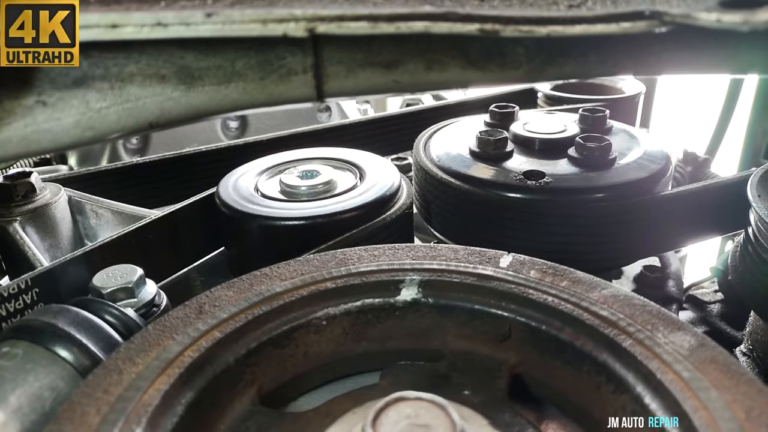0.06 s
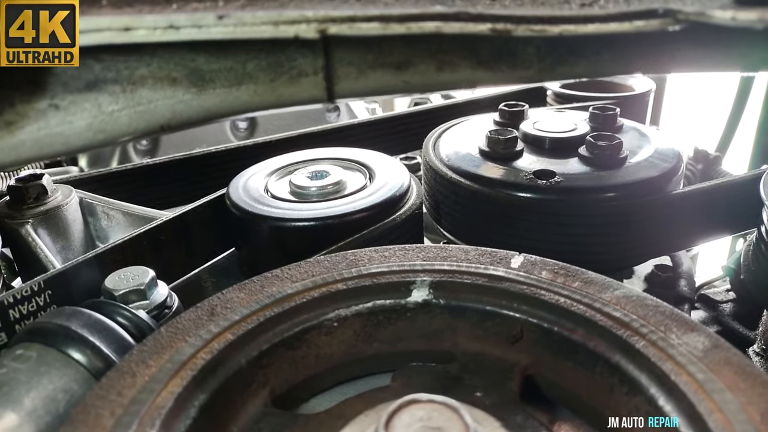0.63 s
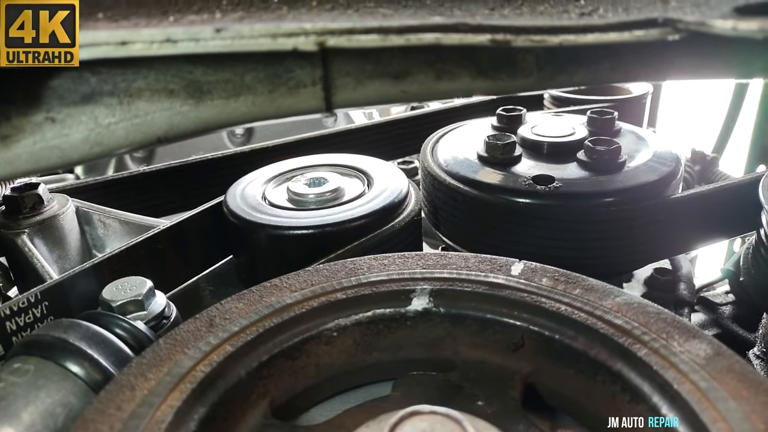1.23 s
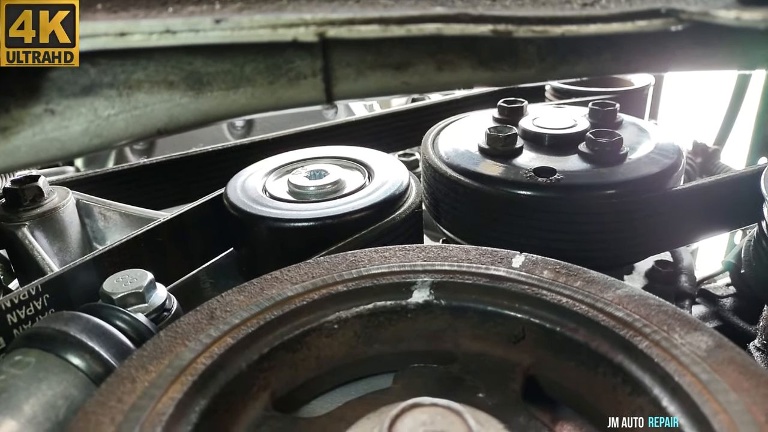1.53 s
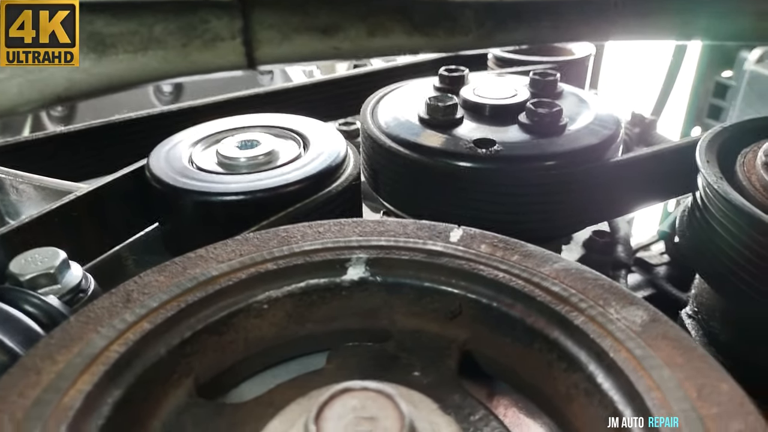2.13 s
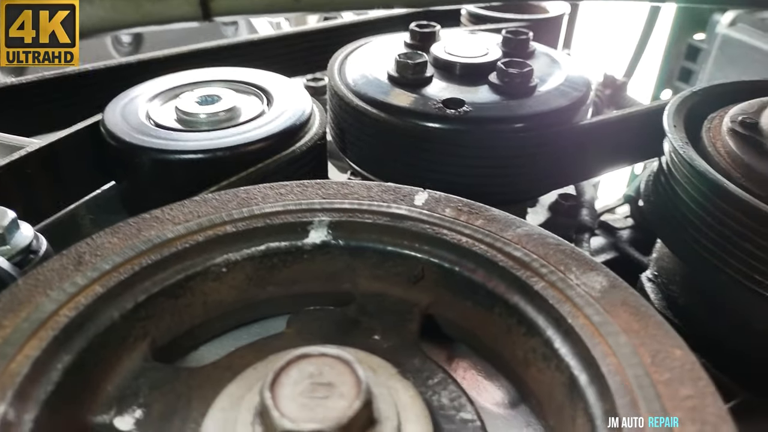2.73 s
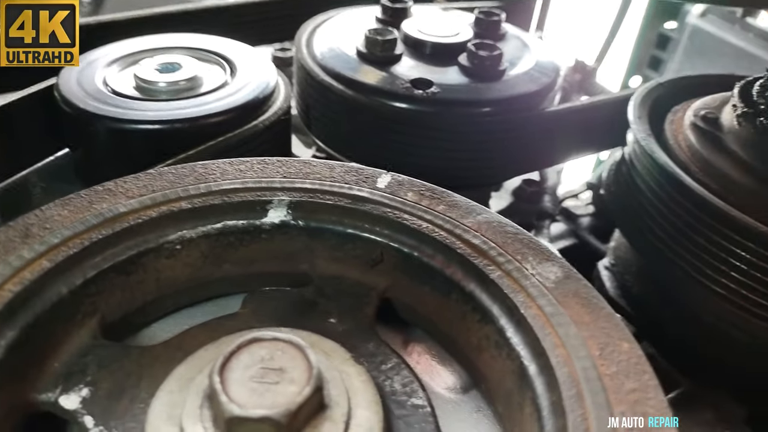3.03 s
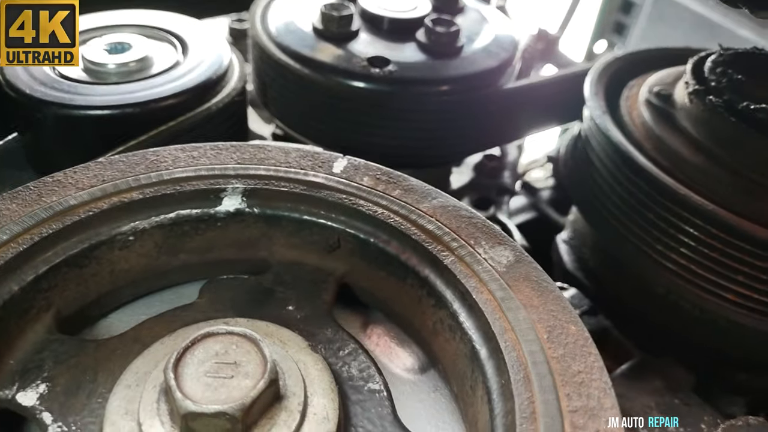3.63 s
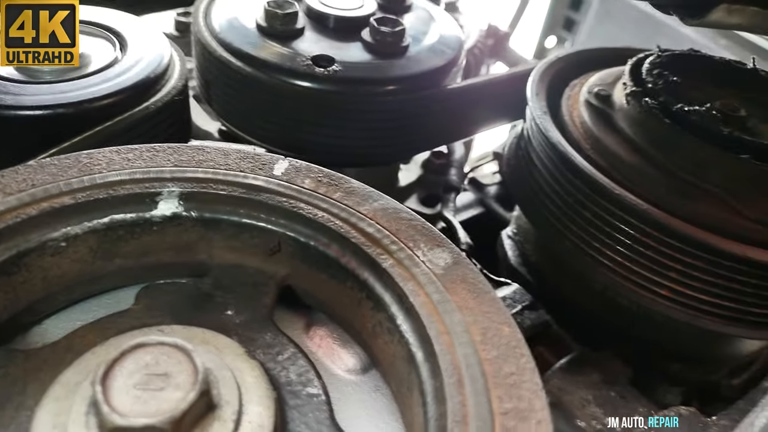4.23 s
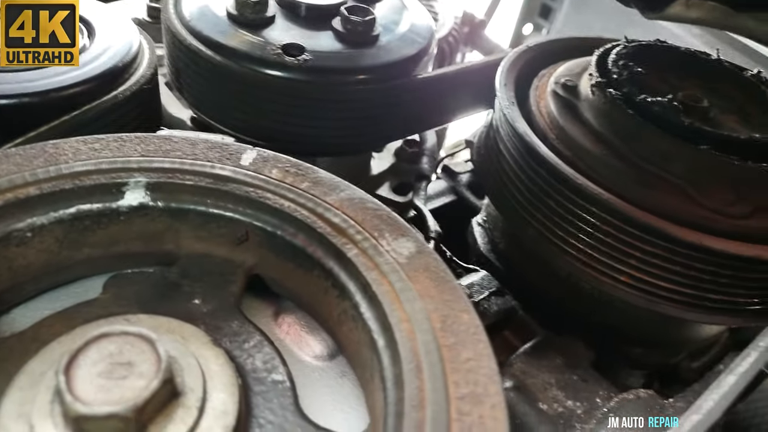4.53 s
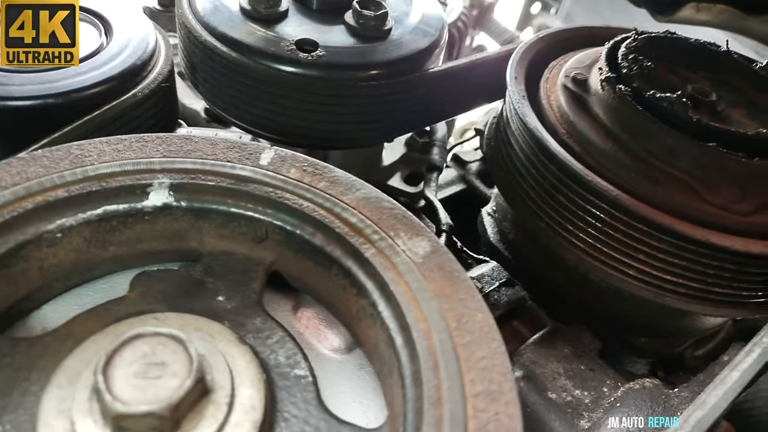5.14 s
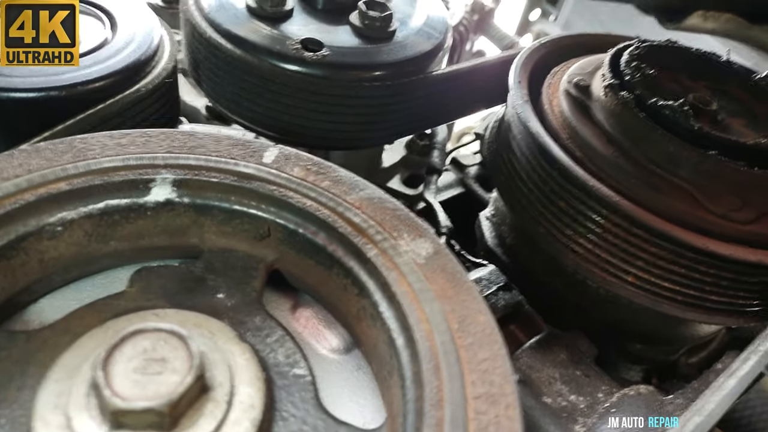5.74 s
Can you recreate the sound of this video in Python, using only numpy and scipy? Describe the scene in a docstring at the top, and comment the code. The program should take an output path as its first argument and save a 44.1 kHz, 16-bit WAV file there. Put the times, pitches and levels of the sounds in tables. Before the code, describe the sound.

Sparrows chirp outdoors over a soft low rumble, with a rooster crowing faintly far away. About two seconds in, a fingertip drags off the right side of the microphone with a loud shuddering thump, followed by several brushing strokes that fade. Small creaks and ticks from the grip come near the end as a distant rooster crows again. The phone is held under a car's stopped engine.

```python
"""A shuddering thump and several brushing strokes sound on the right, followed by small creaks and ticks,
while sparrows chirp and far roosters crow over a low rumble. A phone is held outdoors under a car's
stopped engine. A fingertip seals its right microphone, drags off it by stick-slip friction and brushes
past; the ticks come from the grip on the shell. The birds' voices scatter in the engine bay and yard."""
import sys
import numpy as np
from scipy import signal
from scipy.fft import rfft, irfft, next_fast_len
from scipy.io import wavfile
from scipy.ndimage import uniform_filter1d

SR = 44100
rng = np.random.default_rng(int(sys.argv[2]) if len(sys.argv) > 2 else 0)


def log_audio(samples):
    """Write samples as a 16-bit WAV file to the path given in sys.argv[1]."""
    # one column per channel
    frames = np.atleast_2d(samples).T
    # limit to full scale, then quantise
    limited = np.clip(frames, -1, 1)
    pcm = np.round(limited * 32767).astype(np.int16)
    wavfile.write(sys.argv[1], SR, pcm)


N = 263277
TIME = np.arange(N) / SR


def undb(db):
    """Decibels to amplitude ratio."""
    return 10 ** (np.asarray(db) / 20)


def unit(x):
    """Normalisation to an rms of 1."""
    return x / np.sqrt(np.mean(x ** 2) + 1e-20)


def curve(rows):
    """Linear interpolation of (time_s, value) rows at every sample."""
    return np.interp(TIME, *np.transpose(rows))


def colour(x, spectrum):
    """Zero-phase filtering by (frequency_hz, gain_db) rows, interpolated in log frequency."""
    size = next_fast_len(x.shape[-1])
    hz, db = np.transpose(spectrum)
    gain = undb(np.interp(np.log(np.fft.rfftfreq(size, 1 / SR) + 1e-9), np.log(hz), db))
    return irfft(rfft(x, size) * gain, size)[..., :x.shape[-1]]


def lowpass(x, hz):
    """Two-pole Butterworth low-pass."""
    return signal.sosfilt(signal.butter(2, min(hz, SR / 2 - 1), fs=SR, output="sos"), x)


def moving_lowpass(x, hz):
    """Time-varying low-pass: a crossfade between filters half an octave apart."""
    step = 2 * np.log2(np.clip(hz, 20, SR / 2))
    nearby = range(int(step.min()), int(step.max()) + 2)
    return sum(np.maximum(1 - np.abs(step - k), 0) * lowpass(x, 2 ** (k / 2)) for k in nearby)


def wander(rate_hz):
    """Smooth random modulation with an rms of 1."""
    hop = max(int(SR / rate_hz), 1)
    knots = rng.standard_normal(N // hop + 2)
    return unit(uniform_filter1d(np.interp(np.arange(N) / hop, np.arange(len(knots)), knots), hop))


def bell(peak_s, rise_s, fall_s, squareness=1.11):
    """Asymmetric bell-shaped envelope."""
    late_s = TIME - peak_s
    return np.exp(-np.abs(late_s / np.where(late_s < 0, rise_s, fall_s)) ** squareness / 2)


def add(out, start_s, x):
    """Superposition of x on out from start_s."""
    i = int(np.clip(start_s * SR, 0, N - 1))
    out[..., i:i + x.shape[-1]] += x[..., :N - i]


def yard(x, t60_s, tail_db, scatter_s, scatter_db):
    """Reverberation: each microphone gets the direct path, engine-bay scatter and an outdoor tail."""
    t = np.arange(SR // 2) / SR
    channels = []
    for lag_samples in (9, 0):
        scatter = rng.standard_normal(len(t)) * np.exp(-t / scatter_s)
        tail = rng.standard_normal(len(t)) * (1 - np.exp(-t / .011)) * undb(-60 * t / t60_s)
        response = undb(scatter_db) * scatter / np.linalg.norm(scatter)
        response += undb(tail_db) * tail / np.linalg.norm(tail)
        response[lag_samples] += 1
        channels.append(signal.fftconvolve(x, response / np.linalg.norm(response))[:N])
    return np.array(channels)


def air(level_db=-65.5):
    """Ambient noise: distant rumble, far birds and thin hiss merge into one steady spectrum."""
    # outdoor noise spectrum: frequency_hz, relative_db
    spectrum = [(25, -18), (58, 4.5), (82, 7), (188, -14), (260, -20), (630, -21), (1000, -25),
                (2000, -25.5), (3000, -25), (4100, -21), (5500, -32), (9000, -42), (15500, -47)]
    return unit(colour(rng.standard_normal((2, N)), spectrum)) * undb(level_db)


def hand():
    """Structure-borne noise: the hand shifting on the phone makes a soft rumble."""
    # envelope of the rumble: time_s, level_db
    levels = [(0, -65), (.5, -71.5), (1.6, -74.5), (2.2, -56), (3.5, -59), (4.3, -60.5), (5.5, -63),
              (5.97, -62)]
    # its spectrum: frequency_hz, relative_db
    spectrum = [(25, -40.5), (60, -2), (100, 4), (160, 1), (240, -11), (380, -11.5), (650, -24),
                (1300, -28), (2500, -42), (6000, -42.5), (15000, -50.5)]
    return unit(colour(rng.standard_normal((2, N)), spectrum)) * undb(curve(levels))


def roosters(sag=.04, flutter_db=3):
    """Harmonic voicing: each far note swells, fades and sags, and pitch jitter makes it hoarse."""
    # drawn-out notes: start_s, length_s, pitch_hz, level_db, jitter_share
    crows = [(.06, 1.44, 850, -75, .011), (1.4, .8, 788, -81.5, .016), (4.18, .44, 615.4, -80, .088),
             (5.4, .29, 634.4, -65.5, 0.039), (5.72, .31, 667, -68, 0.05)]
    # the throat favours the second partial: harmonic_number, gain_db
    throat = [(1, -12.5), (2, -4.5), (3, -21.5)]
    out = np.zeros(N)
    for start_s, length_s, pitch_hz, level_db, jitter in crows:
        progress = np.clip((TIME - start_s) / length_s, 0, 1)
        hz = pitch_hz * (1 - sag * progress) * (1 + jitter * wander(170))
        phase = 2 * np.pi * np.cumsum(hz) / SR
        voice = sum(undb(db) * np.sin(round(k) * phase) for k, db in throat)
        swell = np.abs(np.sin(np.pi * progress)) ** 1.5
        out += unit(voice) * undb(level_db + flutter_db * wander(45)) * swell
    return yard(out, t60_s=.55, tail_db=0, scatter_s=.006, scatter_db=3.5)


def flock(count=14, length_s=.09, centre_hz=3790, spread_octaves=.7, level_db=-79.5):
    """Spreading loss leaves the farther sparrows faint: chirp rows at random times and pitches."""
    return [((k + when) / count * N / SR, length_s, centre_hz * 2 ** (spread_octaves * (pitch - .5)),
             level_db, rasp) for k, (when, pitch, rasp) in enumerate(rng.random((count, 3)))]


def chatter(start_s=5.013, period_s=.085, length_s=.056, top_hz=4700, first_db=-70.5, fade_db=1.8):
    """Periodic repetition: chirp rows for one bird's run of raspy, ever fainter notes."""
    return [(start_s + k * period_s, length_s, top_hz, first_db - k * fade_db, 1) for k in range(4)]


def sparrows(warble=.018, flutter_db=3.5, buzz_ratio=.9, buzz_jitter=.1, buzz_db=1.5):
    """Two-voice syrinx: one half whistles a pitch glide; in raspy chirps the other buzzes lower."""
    # chirps that rise and fall: start_s, length_s, top_hz, level_db, rasp_share
    arches = [(.044, 0.062, 4300, -67, .9), (0.104, .11, 4002, -60.5, 0.9), (0.405, .11, 3937, -64, 1),
              (0.514, 0.072, 3950, -62, 0.9), (0.621, 0.048, 3830, -62, 0.7), (.765, 0.055, 5370, -77, 0.1),
              (0.894, .135, 4230, -61.5, 0), (1.505, 0.12, 4246, -63, 1), (2.849, .115, 4204, -61.5, 1),
              (3.0, 0.097, 4560, -72.5, 0.8), (3.234, 0.06, 4646, -66.5, 0.8), (3.545, .17, 4400, -64, .9),
              (4.205, 0.061, 4014, -66, 0.14), (4.64, 0.055, 4400, -68, 1), (4.853, 0.077, 3950, -68, 1),
              (5.388, 0.044, 4280, -62, 0.4), (5.469, 0.052, 3826, -64, 0.5)]
    # chirps that only fall: start_s, top_hz, level_db
    slurs = [(.828, 3410, -71.5), (1.278, 3200, -76.5), (1.64, 3910, -68), (1.808, 3255, -70),
             (1.89, 4150, -65.5), (1.995, 3660, -66), (2.635, 3660, -68), (3.32, 3950, -70.5),
             (3.635, 3900, -64.5), (4.29, 3640, -72.5), (4.688, 3770, -65.5), (5.788, 4024, -61)]
    falling = [(start_s, .074, top_hz, level_db, .48) for start_s, top_hz, level_db in slurs]
    thin_whistle = (3.5, .05, 3250.5, -78, 0)
    out = np.zeros(N)
    wobble, flutter, roughness = wander(260), wander(110), wander(620)
    # a glide starts at the foot (-1) or top (0) of its arch; drop is the share of pitch lost in a .1 s chirp
    kinds = [(-1, .32, arches + chatter() + flock()), (0, .28, falling), (-1, .0203, [thin_whistle])]
    for arch_from, drop, chirps in kinds:
        for start_s, length_s, top_hz, level_db, rasp in chirps:
            n = int(length_s * SR)
            progress = np.linspace(0, 1, n)
            span = rng.integers(N // 2) + np.arange(n)
            sweep = drop * (length_s / .1) ** .35  # longer chirps sweep farther
            glide = 1 - sweep * np.abs(np.linspace(arch_from, 1, n)) ** 1.8
            whistle_hz = top_hz * glide * (1 + warble * wobble[span])
            buzz_hz = buzz_ratio * whistle_hz * (1 + buzz_jitter * roughness[span])
            whistle, buzz = np.sin(2 * np.pi * np.cumsum([whistle_hz, buzz_hz], axis=1) / SR)
            # the chirp starts clean, turns raspy in the middle and leans on its second half
            voice = whistle + rasp * undb(buzz_db) * np.sin(np.pi * progress) * buzz
            swell = (progress * np.sqrt(1 - progress)) ** .3 * undb(flutter_db * flutter[span])
            add(out, start_s, undb(level_db) * unit(swell * voice))
    return yard(out, t60_s=.5, tail_db=-1.5, scatter_s=.007, scatter_db=2)


def grip(crack_decay_s=.0037, thud_hz=330, thud_decay_s=.0032, thud_share=.1):
    """Impulse response of the gripped shell: each creak is a dry crack over a short, damped thud."""
    # creaks: start_s, peak_db, left_minus_right_db
    ticks = [(2.822, -45, 9), (4.621, -59.5, -18), (4.855, -54, -10), (4.881, -54.5, -17),
             (4.911, -54, -17), (4.937, -54, -20.5), (4.973, -52.5, -18), (5.039, -50, -14),
             (5.0638, -51.5, -13), (5.123, -52, -18), (5.333, -44, 1.5), (5.403, -52, 2), (5.949, -50, -14)]
    # response of the shell: frequency_hz, relative_db
    shell = [(80, -11), (300, 14), (700, -8), (1300, -10), (2500, -4), (4000, 0), (6500, -30), (15000, -51)]
    out = np.zeros((2, N))
    t = np.arange(SR // 16) / SR
    for start_s, peak_db, pan_db in ticks:
        crack = colour(rng.standard_normal((2, len(t))) * np.exp(-t / crack_decay_s), shell)
        thud = np.sin(2 * np.pi * thud_hz * rng.uniform(1, 1.42) * t) * np.exp(-t / thud_decay_s)
        tick = crack / np.abs(crack).max() + thud_share * thud
        add(out, start_s, tick * undb(peak_db + np.array([[pan_db], [-pan_db]]) / 2))
    return out


def sealed_port(outdoors, corner_hz=500, leak_db=-23):
    """Occlusion: the covered port passes mostly bass, plus a weak broadband leak."""
    # closure of the right port: time_s, sealed_share
    closure = [(0, 0.81), (2.2, 0.73), (2.4, 0.4), (2.75, 0.03), (2.85, 0)]
    seal = np.clip(curve(closure), 0, 1)
    muffled = lowpass(outdoors, corner_hz) + undb(leak_db) * outdoors
    return (1 - seal) * outdoors + seal * muffled


def rub(corner_hz, catches_per_cycle=4, spread_db=2.5):
    """Stick-slip friction of skin ridges at an even level: a lower corner gives sparser, duller slips."""
    # response of the microphone duct: frequency_hz, relative_db
    duct = [(25, -26), (50, -11), (100, -0.5), (170, -3), (240, -7.5), (340, -2), (520, -2.5), (750, -2.5),
            (1400, -1), (2800, -1.8), (5000, -7.5), (10000, -12.5), (16000, -0.5)]
    slips = (rng.random(N) < catches_per_cycle * corner_hz / SR) * rng.choice([-1, 1], N)
    friction = slips * undb(spread_db * rng.standard_normal(N)) + .11 * rng.standard_normal(N)
    ducted = colour(moving_lowpass(friction, corner_hz), duct)
    return ducted / np.sqrt(uniform_filter1d(ducted ** 2, size=1300) + 1e-20)


def finger_nudges(corner_hz=182):
    """Friction in short, dull bursts as the fingertip shifts while pressed flat."""
    # small shifts: peak_s, level_db
    nudges = [(.03, -53), (1.912, -44), (2.008, -45), (2.381, -45)]
    envelope = sum(undb(db) * bell(peak_s, rise_s=.0063, fall_s=.0098) for peak_s, db in nudges)
    return envelope * rub(np.full(N, corner_hz))


def finger_drag(flat_hz=212, lift_s=2.163, octaves_per_s=29, lifted_hz=1950, gain_db=3.7):
    """Sliding friction: dull while the finger lies flat, brightening as it lifts off the port."""
    # envelope of the drag: time_s, relative_db
    levels = [(2.065, -59.5), (2.096, -35), (2.14, -31.5), (2.165, -24.5), (2.203, -26.5), (2.24, -40.5),
              (2.29, -51), (2.335, -73.5)]
    sliding = uniform_filter1d(1. * ((TIME > levels[0][0]) & (TIME < levels[-1][0])), size=600)
    corner_hz = np.minimum(flat_hz * 2 ** (octaves_per_s * np.clip(TIME - lift_s, 0, 1)), lifted_hz)
    return sliding * undb(curve(levels) + gain_db) * rub(corner_hz)


def finger_brushes(full_speed_hz=6290, fall_over_rise=1.32):
    """Grazing friction: level and bandwidth grow with the speed of the passing finger."""
    # strokes across the port: peak_s, rise_s, level_db
    strokes = [(2.212, 0.054, -54.5), (2.453, 0.03, -41.5), (2.604, .023, -45), (2.793, 0.017, -51.5),
               (2.871, 0.02, -58.5), (2.953, 0.021, -64.5), (3.551, .016, -64.5)]
    speed, envelope = np.zeros((2, N))
    for peak_s, rise_s, level_db in strokes:
        stroke = bell(peak_s, rise_s, rise_s * fall_over_rise, squareness=1.82)
        speed += stroke
        envelope += undb(level_db) * stroke
    return envelope * rub(full_speed_hz * np.clip(speed, .01, 1) ** .23)


def finger_thumps():
    """Compression of trapped air: each jerk of the skin makes a pressure peak between two troughs."""
    # jerks: peak_s, peak_db, pitch_hz
    jerks = [(0.0268, -41, 300), (2.1577, -21.5, 125), (2.168, -17, 167), (2.179, -13.5, 116.5),
             (2.185, -11.5, 273)]
    out = np.zeros(N)
    t = np.arange(-SR // 64, SR // 64) / SR
    for peak_s, peak_db, pitch_hz in jerks:
        phase_squared = (np.pi * pitch_hz * t) ** 2
        add(out, peak_s + t[0], undb(peak_db) * (1 - 2 * phase_squared) * np.exp(-phase_squared))
    return out


def scene(hiss_db=-83):
    """Superposition at two microphones; the fingertip muffles and rubs the right one alone."""
    left, right = air() + sparrows() + roosters()
    fingertip = finger_nudges() + finger_drag() + finger_brushes() + finger_thumps()
    right = sealed_port(right) + fingertip
    return np.array([left, right]) + hand() + grip() + undb(hiss_db) * rng.standard_normal((2, N))


def record(dry):
    """Band limiting: the phone's steep low-pass cuts the top of the treble."""
    cutoff_hz = 15750
    return signal.sosfilt(signal.ellip(10, .2, 70, cutoff_hz, fs=SR, output="sos"), dry)


dry = scene()
out = record(dry)
log_audio(out)
```